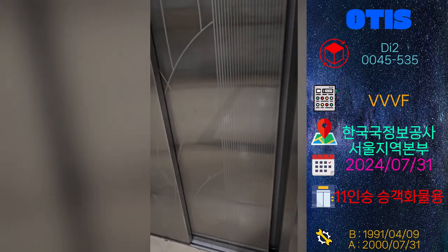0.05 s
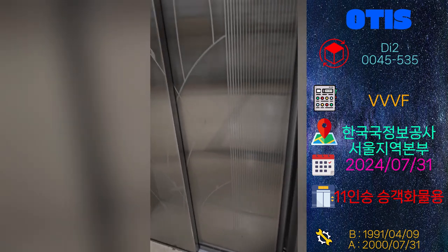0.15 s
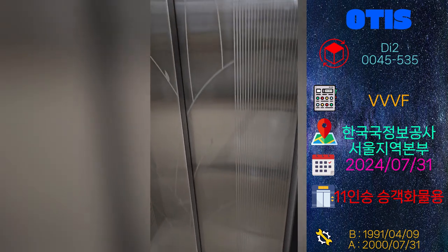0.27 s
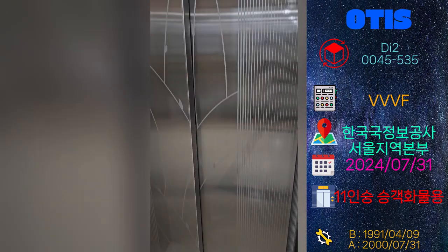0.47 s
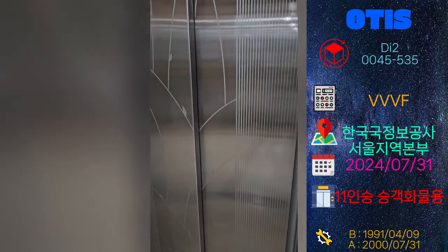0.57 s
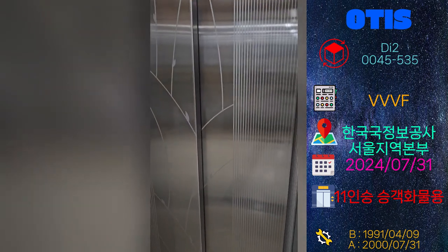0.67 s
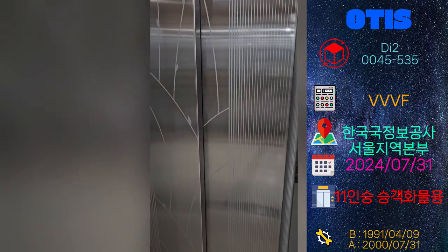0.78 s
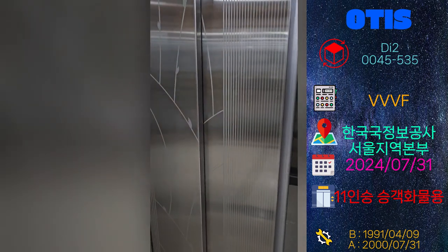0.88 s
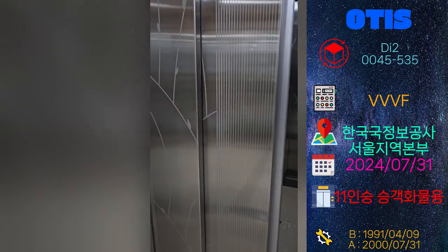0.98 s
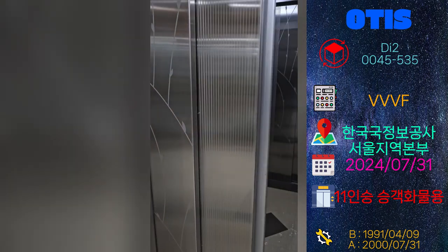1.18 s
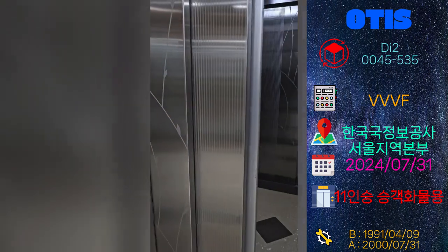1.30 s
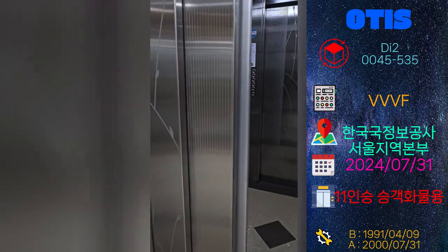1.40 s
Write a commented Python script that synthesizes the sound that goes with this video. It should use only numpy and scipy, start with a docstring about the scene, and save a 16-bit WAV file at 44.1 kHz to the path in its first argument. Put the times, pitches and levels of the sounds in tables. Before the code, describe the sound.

Inside a small steel lift, a door unlocks with a bouncing metallic clack and a hollow thump. As the ringing fades, the door rolls with a quiet rumble, rub and faint scrape while a fan hums throughout.

```python
"""Inside a small steel lift car: the door latch lets go with a sharp, bouncing clack that echoes off
the walls. Two jolts make the door panels boom, and their steel skin rings and shudders.
The car's fan hums throughout; as the door starts to slide, its rollers rumble, its shoes rub,
its track scrapes and a soft hiss grows."""
import sys
import numpy as np
from scipy import signal
from scipy.fft import rfft, irfft
from scipy.io import wavfile

SR = 44100
rng = np.random.default_rng(int(sys.argv[2]) if len(sys.argv) > 2 else 0)


def generate_wav(signal):
    """Clip the signal to [-1, 1] and save it as 16-bit WAV at the path in sys.argv[1]."""
    frames = np.transpose(np.atleast_2d(signal))
    scaled = np.clip(frames, -1, 1) * 32767
    pcm = np.round(scaled).astype(np.int16)
    wavfile.write(sys.argv[1], SR, pcm)


N = 63945

# (time [s], level [dB])
LATCH_CONTACTS = [(0.2163, 0), (0.2188, -3), (0.2252, -10), (0.2338, -10)]
# (frequency [Hz], level [dB], t60 [s])
LATCH_MODES = [(1328, -40.5, 0.18), (1886, -51, 0.54), (2675, -48, 0.28), (3230, -37, 0.026),
               (3770, -38.5, .14), (4090, -43, 0.17), (4140, -35, 0.21), (4307, -42, 0.25),
               (4760, -42.5, 0.041), (5400, -24, .04), (5665, -24.5, 0.022), (7280, -35, 0.066),
               (8020, -30.5, 0.024), (9250, -43.5, 0.068)]
# (frequency [Hz], relative density [dB])
CRACK_SPECTRUM = [(300, -4), (560, 2.5), (1000, -11), (1900, -20), (3000, -7), (4400, 0.5), (5500, 0.5),
                  (6400, -8.5), (8000, -3.5), (10000, -15.5), (15500, -20)]
RELEASE_S = LATCH_CONTACTS[0][0]


def latch(rise_s=0.00083, right_lag_s=0.00002):
    """The latch hits and bounces, slightly to the left; each contact rings and cracks."""
    out = 0
    for start_s, db in LATCH_CONTACTS:
        metal = np.array([ring(LATCH_MODES, start_s + lag_s, rise_s) for lag_s in (0, right_lag_s)])
        crack = undb(-24) * noise(CRACK_SPECTRUM) * strike(start_s, rise_s, t60_s=0.043)
        out += undb(db) * (metal + crack)
    return out * pan(4)


# (frequency [Hz], relative density [dB])
ECHO_SPECTRUM = [(900, 0), (1300, -7), (1900, -3.5), (2400, -4), (3100, -4), (3700, -3), (4250, 4),
                 (5200, -4.5), (6200, -7), (8000, -6), (10000, -14.5), (15500, -30)]


def wall_echo():
    """The clack reverberates between the steel walls."""
    return undb(-36) * noise(ECHO_SPECTRUM) * strike(RELEASE_S, rise_s=0.0078, t60_s=0.61) * pan(0.5)


# (time [s], level [dB])
DOOR_JOLTS = [(0.2278, -0.53), (0.2785, -8.5)]
# (frequency [Hz], level [dB], t60 [s])
PANEL_MODES = [(59.57, -33.5, 1.45), (117.9, -32, 0.7), (147.9, -18.5, 0.25), (167.1, -17.5, 0.64),
               (213.1, -24, 0.86), (217.7, -15, 0.33), (227.5, -14.5, 0.86), (232.6, 4.5, .12),
               (240.3, -24.5, 0.83), (247.6, -15, 0.61), (283, -29, 0.75), (318.7, -34, 0.64)]


def door_boom():
    """Each jolt excites the low modes of door and car."""
    return sum(undb(db) * ring(PANEL_MODES, start_s, rise_s=0.021) for start_s, db in DOOR_JOLTS)


# (frequency [Hz], level [dB], t60 [s])
SKIN_MODES = [(61.5, -38, .3), (124, -29, 0.11), (216, -25.5, 0.13), (354, -36.5, 0.68), (391.6, -41, 0.65),
              (446.5, -38, 0.68), (468, -37, 0.7), (513.5, -30.5, 0.45), (542.3, -32, 0.59),
              (585, -35, 0.57), (596, -37, 0.48), (676, -45, 0.65), (760, -45, 0.46), (894, -46.5, 0.87),
              (1066, -43.5, 0.75)]
# (frequency [Hz], relative density [dB])
SHUDDER_SPECTRUM = [(240, -4.5), (330, -0.5), (410, -2.5), (550, 3), (670, -4.5), (1150, -8), (1700, -25),
                    (3000, -36)]


def door_skin():
    """The sheet-steel skin rings and shudders from the first latch contact."""
    ringing = 0
    for hz, db, t60_s in SKIN_MODES:
        lags_s = rng.random(2) / hz  # each side gets its own point of the cycle
        ringing += np.array([ring([(hz, db, t60_s)], RELEASE_S + lag, rise_s=0.003) for lag in lags_s])
    shudder = undb(-29) * noise(SHUDDER_SPECTRUM) * strike(RELEASE_S, rise_s=0.0081, t60_s=0.65)
    return ringing + shudder


# (frequency [Hz], relative density [dB])
RUMBLE_SPECTRUM = [(18, -24), (30, -7.5), (50, -1), (82, 0), (115, -4), (145, -9.5), (220, -29)]
# (time [s], level [dB])
RUMBLE_ENVELOPE = [(0, -42), (.22, -38), (.5, -41), (.62, -49), (.8, -49), (.98, -40.5), (1.28, -40),
                   (1.36, -50.5), (1.45, -47)]


def rumble():
    """The car and the door rollers rumble in two deep swells."""
    return noise(RUMBLE_SPECTRUM) * swell(RUMBLE_ENVELOPE)


# (frequency [Hz], relative density [dB])
HISS_SPECTRUM = [(200, 3.5), (450, 4.5), (750, 1), (1300, -0.5), (1800, -2), (3000, -4.5), (3900, -5.5),
                 (4550, -4.5), (5500, -6.5), (7500, -7.5), (10000, -11.2), (12000, -10.5), (15500, -14)]
SHOE_SPECTRUM = [(800, -12), (1100, 2.5), (1400, 2), (1700, -9.5), (2300, -10.5), (2900, -28)]
TRACK_SPECTRUM = [(3700, -16), (4600, 0.5), (5300, -12), (8000, -20), (11000, -19), (11700, -10),
                  (12500, -22)]
# (time [s], level [dB])
HISS_ENVELOPE = [(0, -54), (.2, -53.5), (.5, -51.5), (.65, -51.5), (.8, -50), (1.0, -50), (1.2, -48.5),
                 (1.45, -48)]
SHOE_ENVELOPE = [(.2, -86), (.55, -62.5), (.85, -59), (1.15, -53), (1.45, -52.5)]
TRACK_ENVELOPE = [(.55, -82), (.78, -61.5), (1.38, -61.5), (1.45, -53.5)]


def door_slide():
    """Air and sliding door hiss, the shoes rub in the sill and the track scrapes thinly."""
    hiss = noise(HISS_SPECTRUM) * swell(HISS_ENVELOPE)
    rub = noise(SHOE_SPECTRUM) * swell(SHOE_ENVELOPE)
    scrape = noise(TRACK_SPECTRUM) * swell(TRACK_ENVELOPE)
    return (hiss + rub + scrape) * pan(0.5)


# (frequency [Hz], relative density [dB])
FAN_SPECTRUM = [(110, -5.5), (165, -0.5), (195, -2.5), (235, 0), (275, -5), (310, -11), (560, -10.5),
                (720, -21.5), (1000, -31), (3000, -65)]


def fan():
    """The car's fan hums as steady low noise."""
    return undb(-44.5) * noise(FAN_SPECTRUM)


# (frequency [Hz], left-right correlation [-])
CAR_COHERENCE = [(100, .97), (230, 0.93), (350, 0.77), (520, 0.12), (1000, -0.034), (2000, -0.024)]


def noise(spectrum):
    """Coloured stereo noise of rms 1, alike in the bass and wide in the treble, as in a small room."""
    hz = np.maximum(np.fft.rfftfreq(N, 1 / SR), 1)

    def per_bin(table):
        table_hz, values = np.array(table).T
        return np.interp(np.log(hz), np.log(table_hz), values)

    low_cut = np.minimum(hz / spectrum[0][0], 1) ** 2
    high_cut = np.minimum(spectrum[-1][0] / hz, 1) ** 2
    gain = undb(per_bin(spectrum)) * low_cut * high_cut
    alike = per_bin(CAR_COHERENCE)
    mid, side = rfft(rng.standard_normal((2, N))) * gain * np.sqrt([1 + alike, 1 - alike])
    out = irfft(np.array([mid + side, mid - side]), N)
    return out / out.std()


def ring(modes, start_s, rise_s):
    """Decaying modes set off at one moment."""
    return sum(undb(db) * np.sin(2 * np.pi * hz * since(start_s)) * strike(start_s, rise_s, t60_s)
               for hz, db, t60_s in modes)


def strike(start_s, rise_s, t60_s):
    """Envelope that builds up and dies away."""
    age_s = since(start_s)
    return (1 - np.exp(-(age_s / rise_s) ** 2)) * np.exp(-np.log(1000) * age_s / t60_s)


def swell(envelope):
    """Gain along a (time [s], level [dB]) curve."""
    return undb(np.interp(since(0), *np.array(envelope).T))


def pan(left_lead_db):
    """Left and right gains for a level difference."""
    return undb(np.array([[left_lead_db], [-left_lead_db]]) / 2)


def since(start_s):
    """Seconds since a moment, zero before it."""
    return np.maximum(np.arange(N) / SR - start_s, 0)


def undb(db):
    """Decibels to gain."""
    return 10 ** (np.asarray(db) / 20)


def scene():
    """Latch, door and car together."""
    return latch() + wall_echo() + door_boom() + door_skin() + rumble() + door_slide() + fan()


def record(dry):
    """4 ms fade-in, steep low-pass at 15.5 kHz."""
    fade_in = np.minimum(since(0) / 0.004, 1)
    low_pass = signal.ellip(10, 0.2, 80, 15500, fs=SR, output="sos")
    return signal.sosfilt(low_pass, dry * fade_in)


dry = scene()
out = record(dry)
generate_wav(out)
```